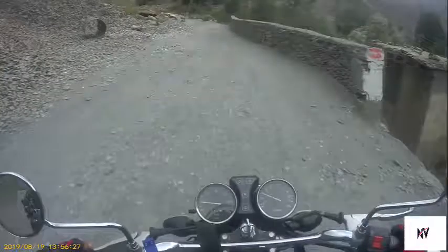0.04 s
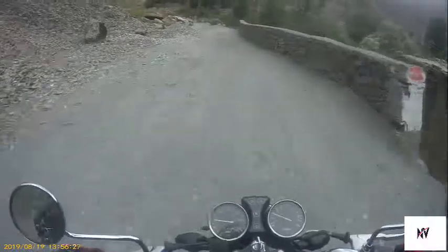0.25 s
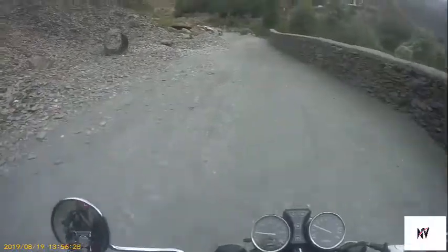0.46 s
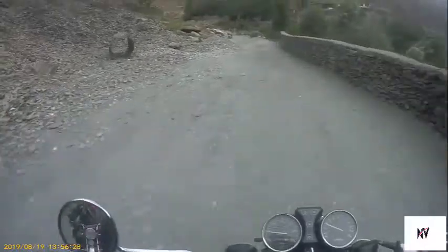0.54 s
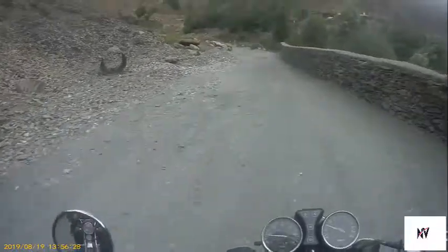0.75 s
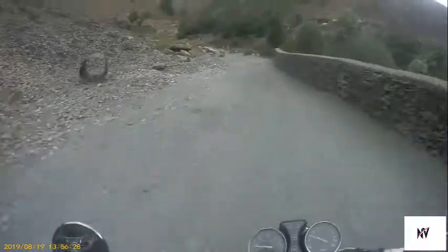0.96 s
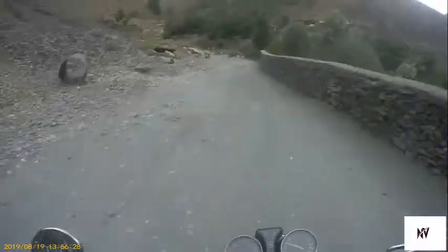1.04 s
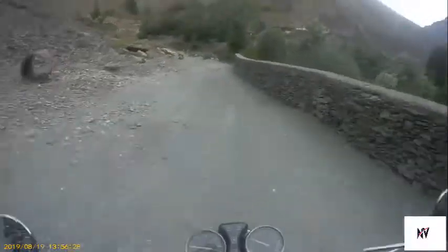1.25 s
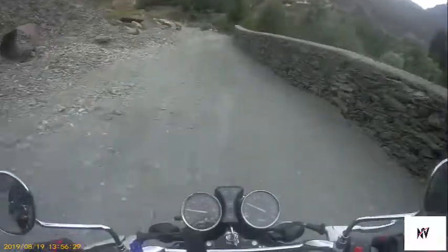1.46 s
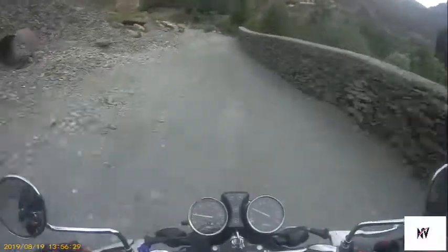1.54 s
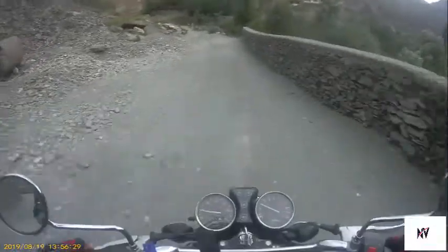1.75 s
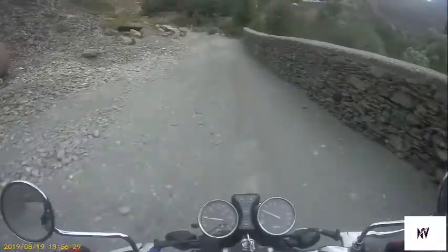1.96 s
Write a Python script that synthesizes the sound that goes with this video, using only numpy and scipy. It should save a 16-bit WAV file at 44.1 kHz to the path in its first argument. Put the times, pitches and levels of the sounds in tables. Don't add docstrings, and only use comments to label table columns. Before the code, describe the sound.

Low single-cylinder motorcycle chugging over rough gravel, wind buffeting, stones knocking and loose metal ticking

```python
import sys
import numpy as np
from scipy import signal
from scipy.fft import rfft, irfft
from scipy.io import wavfile
from scipy.ndimage import uniform_filter1d

SR = 44100
rng = np.random.default_rng(int(sys.argv[2]) if len(sys.argv) > 2 else 0)


def natural_amplitude(level_db):
    exponent = np.asarray(level_db, float) / 20
    return 10 ** exponent


def store_wav(level_fs):
    pcm = np.round(np.clip(np.atleast_2d(level_fs), -1, 1) * 32767)
    wavfile.write(sys.argv[1], SR, pcm.T.astype(np.int16))


N = 88288

# t/s, level/dB
SURFACE = [(0, 1), (.19, 1), (.222, 5), (.26, 1), (.58, 2), (.62, -0.5), (.66, 0.5), (.79, 4), (.83, 3.5),
           (.9, 2), (1.04, 2.5), (1.09, 1), (1.15, 0), (1.3, 0.5), (1.6, 1.5), (1.68, 1), (1.78, -2.5),
           (2, 3)]


def level(x, db):
    return x * natural_amplitude(db) / np.sqrt(np.mean(x ** 2))


def band(x, hz, width):
    return signal.lfilter(*signal.iirpeak(hz, hz / width, SR), x)


def struck_body(push, modes):
    out = 0
    for hz, width, db in modes:
        once = band(push, hz, width)
        out = out + natural_amplitude(db) * band(once, hz, width) / np.sqrt(width)
    return out


def butter(x, order, edge, kind="low"):
    return signal.sosfilt(signal.butter(order, edge, kind, fs=SR, output="sos"), x)


def walk(rate):
    k = int(SR / rate)
    held = np.repeat(rng.standard_normal(N // k + 1), k)
    return 1.3 * uniform_filter1d(uniform_filter1d(held, k), k)[:N]


def curve(table, axis):
    rows = np.array(table)
    return np.interp(np.arange(N) / SR, rows[:, 0], rows[:, axis])


def ring(at, db, hz, t60, rise=0.0013, turn=0.):
    out, start = np.zeros(N), int(at * SR) + 1
    part = out[start:start + int(t60 * SR)]
    t = (start + np.arange(len(part))) / SR - at
    decay = natural_amplitude(db - 60 * t / t60)
    part[:] = decay * (1 - np.exp(-t / rise)) * np.sin(2 * np.pi * hz * t + turn)
    return out


def firing_cycles():
    firing_hz, first_firing_s = 23.12, .037
    speed = firing_hz * (1 + .004 * walk(13.73))
    return 1 - first_firing_s * firing_hz + np.cumsum(speed) / SR


def engine(cycles):
    # t/s, load level/dB, frame buzz level/dB
    throttle = [(0, -11, 3), (.08, 0.5, 5), (.22, 4, 5.5), (.31, 2.5, 6), (.46, 0, -1), (.55, -13, 6),
                (.61, 1, -13), (.67, -9, 8.5), (.76, 7, 1.5), (.95, 2, -3.5), (1.04, 1.5, 0),
                (1.08, -1.5, 7.5), (1.21, -5, 0.5), (1.32, -3.5, 1.5), (1.5, 0, 1), (1.62, 0.5, -12.5),
                (1.8, 1.5, 4), (2, -1, -10)]
    # multiple of firing rate, level/dB
    orders = [(1, -8), (2, 0.5), (3, -8.5), (4, -9), (5, -4), (6, -2.5), (7, -46), (8, -13.5), (9, -55),
              (10, -20), (11, -20), (12, -19.5)]
    # f/Hz, width/Hz, level/dB
    pipe_modes = [(180, 16.5, -1.5), (210.6, 24.7, -1), (255, 23, 3.5), (316, 83, -5)]
    tone = 0
    for k, db in orders:
        lag = 1.6 * (k < 3)
        tone = tone + natural_amplitude(db + 3 * walk(5.38)) * np.cos(2 * np.pi * k * cycles - lag)
    strength = natural_amplitude(8.5 * rng.standard_normal(64))
    fired = np.diff(np.floor(cycles), prepend=0) * strength[cycles.astype(int)]
    push = level(fired, 0) + natural_amplitude(4.5) * rng.standard_normal(N)
    pipe = struck_body(push, [(hz, 1.82 * w, db - 10 * np.log10(1 / 1.82)) for hz, w, db in pipe_modes])
    pipe = pipe / uniform_filter1d(pipe ** 2, size=3000) ** .4
    frame = level(tone, -44.5) * natural_amplitude(curve(throttle, axis=1))
    return frame + level(pipe, -54) * natural_amplitude(curve(throttle, axis=2))


def tank_strands():
    # f/Hz, width/Hz, level/dB
    pitches = [(580.2, 58, -3.5), (708.7, 54, -4.5)]
    # t/s, level/dB
    hum = [(0, -6), (.12, -2.5), (.2, 4.5), (.5, 2), (.62, 0.5), (.7, 4.5), (.8, -0.5), (.9, -4),
           (1.4, -5.5), (2, -8)]
    out = 0
    for hz, width, db in pitches:
        swing = level(butter(rng.standard_normal((2, N)), 2, width), db)
        turn = 2 * np.pi * np.cumsum(hz * (1 + .03 * walk(5.5))) / SR
        out = out + swing[0] * np.cos(turn) + swing[1] * np.sin(turn)
    return level(out, -54.5) * natural_amplitude(curve(hum, axis=1))


def wind():
    # t/s, level/dB
    gusts = [(0, -36.5), (.37, -43.5), (.41, -50), (.49, -34.5), (.62, -43), (.73, -37.5), (.78, -52),
             (.93, -52), (.97, -37), (1.1, -39), (1.5, -44), (1.68, -40.5), (1.72, -42.5), (1.8, -37),
             (1.89, -44), (2, -32)]
    gust_db = curve(gusts, axis=1)
    air = band(rng.standard_normal(N), 23, 14.8)
    air = butter(air * natural_amplitude(gust_db / 2), 4, 45)
    even = air / np.sqrt(uniform_filter1d(air ** 2, size=5000))
    return even * natural_amplitude(uniform_filter1d(gust_db, size=900) + 0.5)


def road():
    # f/Hz, level per Hz/dB
    spectrum = [(35, -31), (60, -6), (202, -10), (267, -11.5), (436, -16), (1330, -14), (1850, -22),
                (13700, -34), (15800, -37.5)]
    crunch_top_hz = 2500
    hz, db = np.transpose(spectrum)
    f = np.fft.rfftfreq(N, 1 / SR) + 1
    shape = natural_amplitude(np.interp(np.log(f), np.log(hz), db)) * (f > 55)
    noise = rfft(rng.standard_normal(N)) * shape
    swell = walk(8.3) + walk(25.7)
    rough = curve(SURFACE, axis=1)
    out = 0
    for octave in np.arange(5.5, 14.6, .5):
        share = np.clip(1 - 2 * np.abs(np.log2(f) - octave), 0, 1)
        band_db = .45 * swell + .6 * walk(12.15) + rough * (2 ** octave < crunch_top_hz)
        out = out + natural_amplitude(band_db) * irfft(noise * share, N)
    return level(out, -46.5)


def gravel(cycles):
    # f/Hz, width/Hz, level/dB
    housing = [(1276, 100, 0.5), (1350, 60, 1.5), (1640, 50, -11), (1480, 70, -9.5)]
    clicks_per_s, scatter_db = 2500, 2.2
    draw = rng.random((3, N))
    size = natural_amplitude(-scatter_db * np.log(draw[2] + 1e-9))
    clicks = (draw[0] < clicks_per_s / SR) * np.sign(draw[1] - .5) * size
    clicks = clicks * (1 + .2 * np.sin(2 * np.pi * cycles)) * natural_amplitude(0.53 * walk(10.7))
    rung = struck_body(clicks, [(hz, 1.93 * w, db) for hz, w, db in housing])
    return level(rung, -54.5) * natural_amplitude(curve(SURFACE, axis=1))


def grit():
    # t/s, level/dB
    thrown = [(0, 6), (.3, -6), (.7, -2), (.78, 6), (.95, 1), (1.38, -2), (1.45, 6), (1.52, 2), (1.58, 0),
              (1.63, 7), (1.71, 6), (1.76, -1), (2, -0.5)]
    draw = rng.random((2, N))
    hits = (draw[0] < 300 / SR) * (draw[1] - .5)
    return level(band(hits, 2400, 2500.0), -63) * natural_amplitude(curve(thrown, axis=1))


def shimmer():
    # f/Hz, width/Hz, level/dB
    bands = [(13400, 150, -76), (13800, 500, -74), (14100, 150, -79)]
    hiss = rng.standard_normal(N)
    return sum(level(band(hiss, hz, w), db) for hz, w, db in bands) * natural_amplitude(2.3 * walk(9.3))


def heaves():
    # t/s, peak level/dB, f/Hz
    thumps = [(.795, -17, 28), (.8655, -11, 25), (.911, -22, 20), (.014, -27, 30), (.551, -25, 36),
              (.725, -26, 36), (.989, -25, 40), (1.634, -27, 40), (1.677, -24, 36), (1.783, -24, 32),
              (1.829, -25, 32), (1.961, -20, 40)]
    return sum(ring(s, db, hz, 1.9 / hz, rise=.004) for s, db, hz in thumps)


def jingle_ticks():
    # t/s, peak level/dB
    taps = [(.0453, -54), (.0638, -53), (.4028, -51), (.420, -52), (.4338, -44.5), (.449, -53),
            (.464, -44.5), (.512, -53), (.666, -53), (.684, -44), (.699, -46), (.885, -53), (.971, -54),
            (1.0447, -46), (1.0597, -47), (1.0767, -45.5), (1.0875, -53), (1.098, -49), (1.1006, -47),
            (1.1045, -50), (1.545, -52), (1.5628, -45), (1.5717, -50), (1.583, -50), (1.9163, -46),
            (1.9314, -45), (1.9483, -47.5)]
    # f/Hz, level/dB, t60/s
    modes = [(7430, -12, .02), (9500, -9, .012), (10800, -13, .007), (13390, -6, .014), (13800, -5, .008),
             (14100, -5, .012), (14600, -5, .006), (15100, -7, .005)]
    out = 0
    for s, db in taps:
        for hz, part_db, t60 in modes:
            turn, odd = 2 * np.pi * rng.random(), rng.standard_normal()
            mode_db, mode_hz = db + part_db + 1.5 * odd, hz * (1 + .006 * odd)
            out = out + ring(s, mode_db, mode_hz, t60, rise=.0002, turn=turn)
    return out


def pebbles():
    # t/s, peak level/dB, f/Hz
    strikes = [(0.0468, -42, 1460), (0.0652, -42, 1220), (0.2184, -39, 1360), (0.3114, -38, 1300),
               (0.3556, -47, 1310), (0.427, -42, 1280), (0.5046, -47, 1260), (0.6674, -34, 1210),
               (0.6796, -37, 1296), (0.7387, -37, 1300), (0.7776, -40, 1180), (0.797, -36, 1340),
               (0.839, -34, 1290), (0.8555, -32, 1190), (0.9063, -40, 1390), (1.0161, -35, 1340),
               (1.0405, -45, 1260), (1.215, -44, 1180), (1.359, -46, 1347), (1.399, -41, 1330),
               (1.4656, -42, 1320), (1.504, -46, 1314), (1.6716, -42, 1190), (1.7085, -43, 1330),
               (1.794, -47, 1310), (1.819, -43, 1270)]
    return sum(ring(s, db - 2, hz, .045, rise=.002) for s, db, hz in strikes)


def jolts():
    # t/s, peak level/dB, frame f/Hz, t60/s, knock level/dB
    stones = [(0.218, -33, 183, 0.094, -36.5), (.224, -36, 341, 0.078, -48), (.251, -36, 180, 0.55, -45),
              (0.271, -31, 135, 0.088, -42), (0.456, -32.5, 180, 0.086, -48.5),
              (0.787, -25.5, 230, 0.081, -52), (0.8099, -26.5, 194, 0.098, -58), (.849, -17, 24, .075, -60),
              (.8554, -17, 238, .045, -29), (.859, -31, 330, .03, -50), (0.883, -32.5, 231, 0.066, -44),
              (1.06, -35.5, 255, 0.13, -59), (1.091, -32.5, 180, 0.12, -43), (1.107, -32, 116, 0.16, -41),
              (1.194, -32.5, 110, 0.15, -76), (1.571, -39, 240, 0.16, -44)]
    # f/Hz, level/dB, t60/s
    knock = [(420, -1, .025), (640, 0, .022), (900, -3, .02), (1150, 0, .025), (1450, -2, .018),
             (1900, -5, .012), (2700, -9, .01), (3400, -11, .01), (4300, -12, .01)]
    out = 0
    for s, db, hz, t60, knock_db in stones:
        out = out - ring(s, db, hz, t60, rise=0.003)
        for mode_hz, mode_db, mode_t60 in knock:
            struck_hz = mode_hz * (1 + .03 * rng.standard_normal())
            out = out - ring(s + .0009, knock_db + mode_db, struck_hz, mode_t60, rise=.0004)
    return out


def rattle():
    # t/s, length/s, thin level/dB, broad level/dB
    shakes = [(.408, .068, -65, -58.5), (.658, .052, -64.5, -64), (1.038, .075, -65.5, -60.5),
              (1.53, .075, -64, -66), (1.91, .052, -65.5, -63)]
    # low f/Hz, high f/Hz
    edges = [(13100, 15000), (6200, 11200)]
    t, edge_s = np.arange(N) / SR, .012
    hits = rng.random(N) < 3000 / SR
    grains = rng.standard_normal(N) * hits * natural_amplitude(2.5 * walk(90))
    thin, broad = (level(butter(grains, 3, edge, "band"), 0) for edge in edges)
    out = 0
    for s, length, thin_db, broad_db in shakes:
        gate = np.clip(np.minimum(t - s, s + length - t) / edge_s, 0, 1)
        out = out + gate * (natural_amplitude(thin_db) * thin + natural_amplitude(broad_db) * broad)
    return out


def pings():
    # t/s, peak level/dB, f/Hz, t60/s
    strikes = [(.749, -52, 7400, .02), (.749, -56, 12000, .02), (.8096, -44, 6840, .022),
               (.809, -57, 14100, .07), (.754, -57, 14100, .05), (1.541, -52, 9600, .025),
               (.4145, -47, 9400, .012), (1.042, -50, 9400, .015), (1.099, -48, 9500, .02),
               (1.078, -51, 6200, .03), (1.093, -49, 6300, .012), (.424, -52, 7400, .03)]
    return sum(ring(s, db, hz, t60) for s, db, hz, t60 in strikes)


def scene():
    cycles = firing_cycles()
    machine = engine(cycles) + tank_strands()
    ground = wind() + road() + gravel(cycles) + grit() + pebbles()
    shaken = heaves() + jolts()
    loose_metal = shimmer() + jingle_ticks() + rattle() + pings()
    return (machine + ground + shaken + loose_metal)[None]


def band_limit(x):
    return signal.sosfilt(signal.butter(12, 15660, fs=SR, output="sos"), x)


def record(dry):
    bass_cut = butter(dry, 2, 11, "high")
    top_cut = signal.ellip(12, .2, 90, 15600, fs=SR, output="sos")
    mix = signal.sosfilt(top_cut, bass_cut)
    return band_limit(mix)


dry = scene()
out = record(dry)
store_wav(out)
```